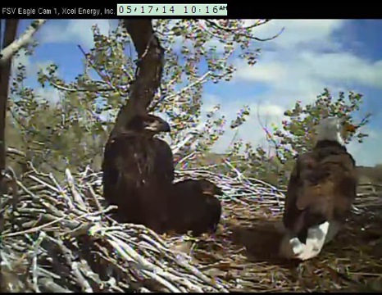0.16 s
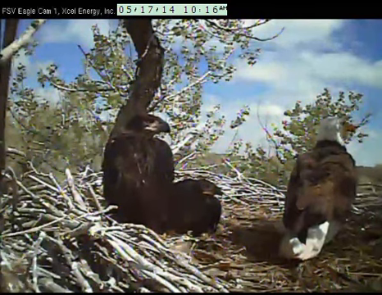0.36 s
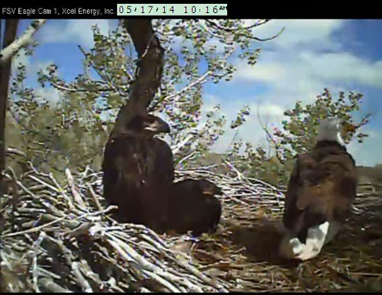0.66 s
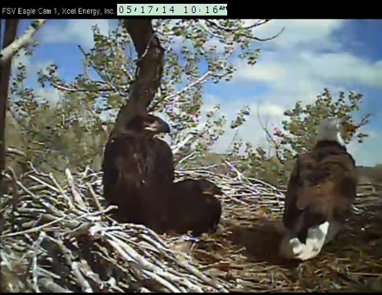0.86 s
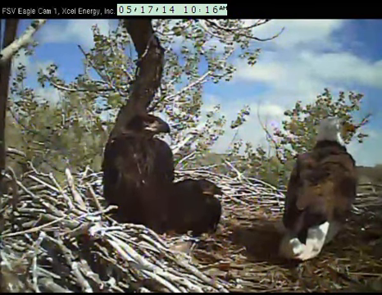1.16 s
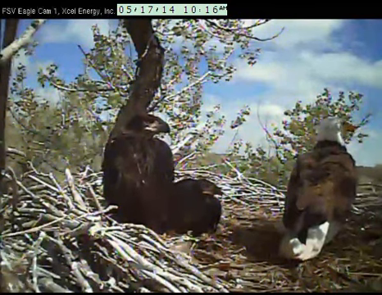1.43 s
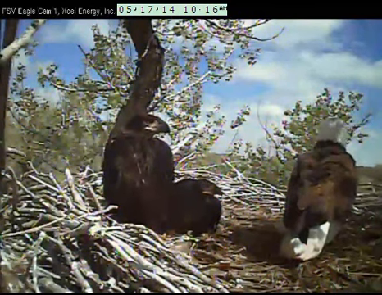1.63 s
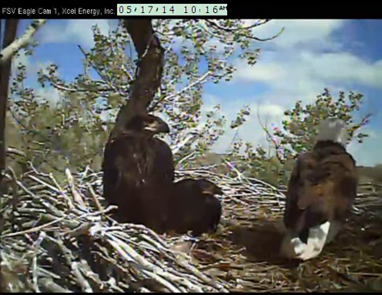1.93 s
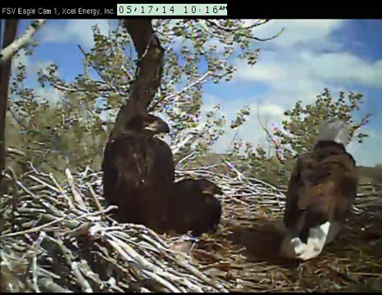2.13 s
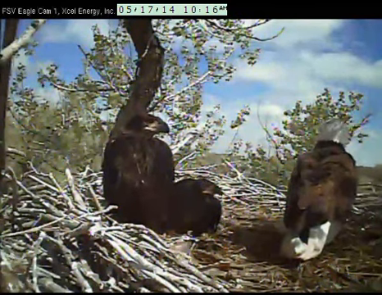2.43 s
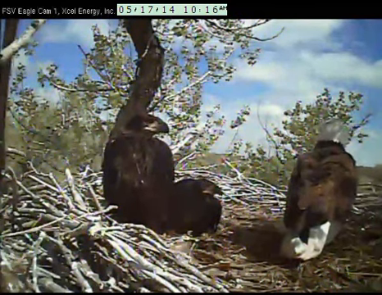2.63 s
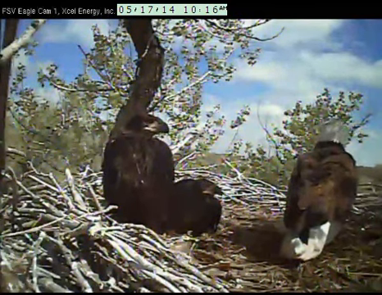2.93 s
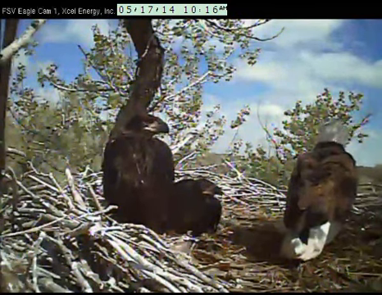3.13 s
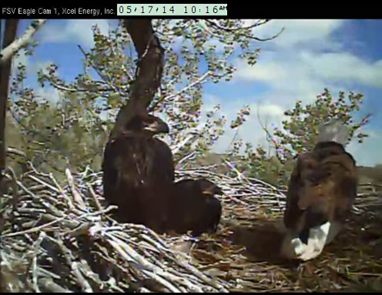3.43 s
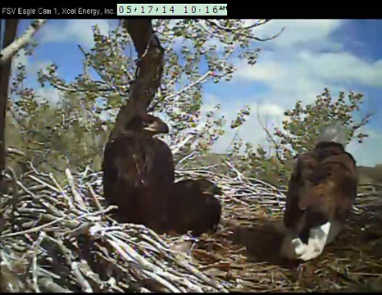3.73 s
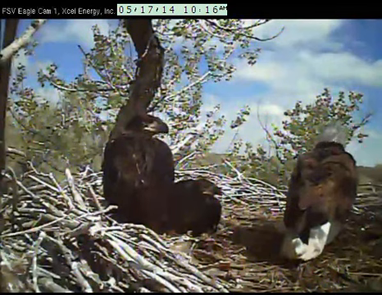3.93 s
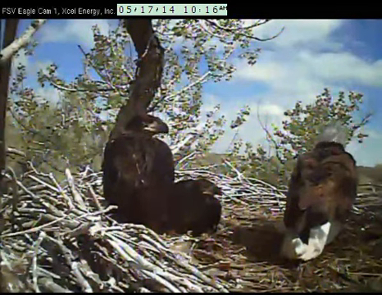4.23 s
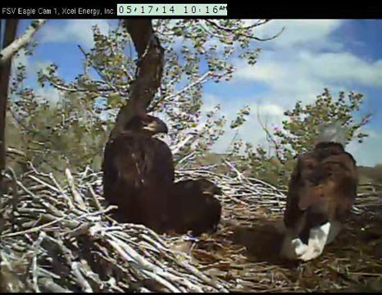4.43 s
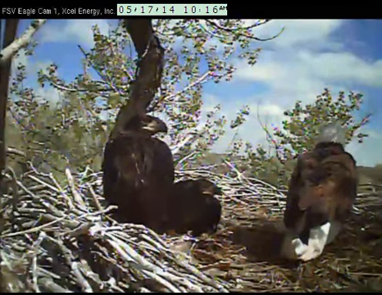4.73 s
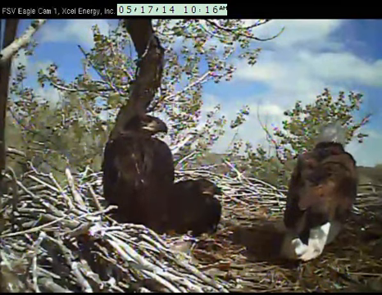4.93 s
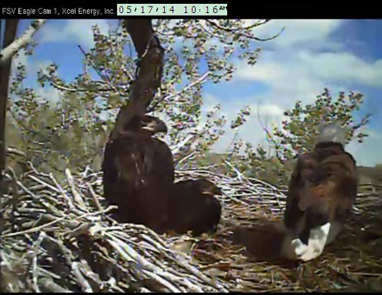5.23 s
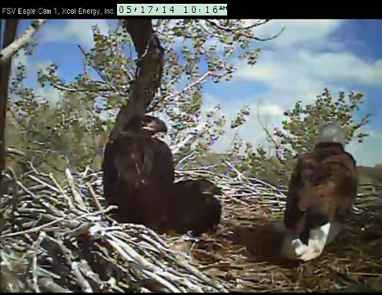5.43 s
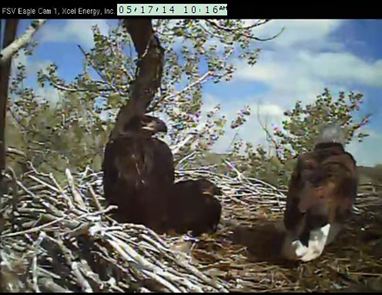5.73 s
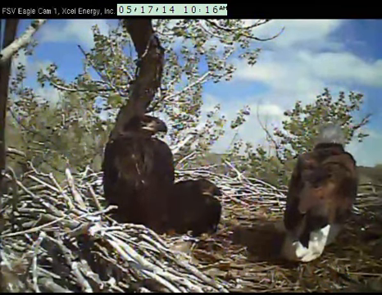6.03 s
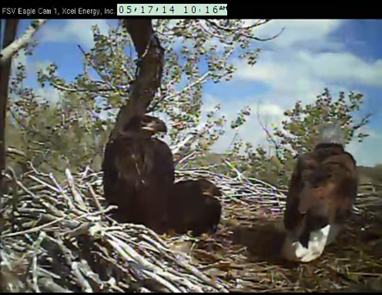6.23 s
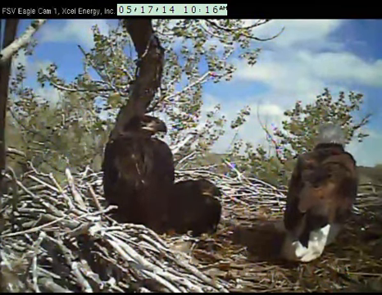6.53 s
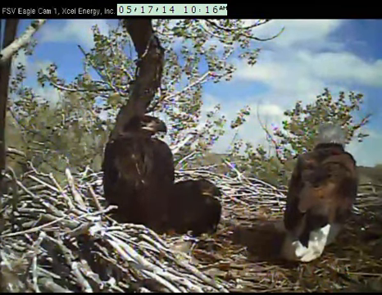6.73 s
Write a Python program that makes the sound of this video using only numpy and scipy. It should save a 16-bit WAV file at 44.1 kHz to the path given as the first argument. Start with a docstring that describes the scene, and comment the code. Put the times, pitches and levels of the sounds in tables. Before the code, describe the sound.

Steady low hum, a wavering fan whine, hiss and soft wind continue throughout, heard through a small, treble-limited microphone. A hollow gust swells around 0.8 s; faint high peeps occur near 0.6 and 1.3 s, with tiny twig ticks scattered about. At 1.65 s an eagle squeaks, then a wavering cry begins; a strong whistled scream joins it from 1.95 to 2.7 s, harsh with overload and beating side tones. After a quiet gap, a short cluck leads to a second, rising scream from 3.3 to 4.0 s, followed immediately by a higher buzzing yelp. From 4.6 to 5.0 s a third scream overlaps quick yelps; a higher yelp and a lower wail carry on to about 5.85 s. Thin songbird notes start at 5.65 s, becoming brighter, raspy upward chirps around 6.0-6.45 s, with a final eagle yelp near 6.4-6.6 s. Smaller chirps fade into wind and hum.

```python
"""At a nest in trees, eagles scream close to a fixed camera whose microphone stage overloads.
The eagles are nearly pure tones with weak harmonics, shaken or buzzed by modulation, plus a hiss of air.
Each loud whistle squares off, pushes the wind and hum down and breeds side tones with the second voice.
Small birds chirp further off as swept sines, and twigs tick as brief resonant noise.
Wind is shaped noise, hum and fan are sine lines, and the trees return a short echo of the birds."""
import sys
import numpy as np
from scipy import signal
from scipy.fft import rfft, irfft
from scipy.io import wavfile
from scipy.ndimage import uniform_filter1d

SR = 44100
rng = np.random.default_rng(int(sys.argv[2]) if len(sys.argv) > 2 else 0)


def int16_out(signal):
    """Quantize to a 16-bit WAV file."""
    q = np.round(np.clip(np.atleast_2d(signal).T, -1, 1) * 32767)
    wavfile.write(sys.argv[1], SR, q.astype(np.int16))


N = 302526
TIME = np.arange(N) / SR

# songbird syllable shapes named by the chirp table: length_share, pitch_ratio, level_db
RISE = [(0, .74, -21), (0.248, .91, -9), (0.479, 1, -1.5), (0.679, 1.06, -9), (.85, 1.22, -20),
        (1, 1.33, -23)]
FALL = [(0, 1.2, -2.5), (.25, 1.05, -5.5), (.6, .94, -2.5), (1, .82, -22)]
PEEP = [(0, 1.015, -12), (.2, 1, 0), (.7, 1, 0), (1, .99, -12)]


def undb(db):
    """Decibels to amplitude: 20 dB is a factor of ten."""
    return 10 ** (np.asarray(db) / 20)


def unit(x):
    """Normalise the signal power to rms 1."""
    return x / np.sqrt(np.mean(x ** 2))


def bump(x, centre, width):
    """A Gaussian rise and fall, 1 at the centre and 1/e one width away."""
    return np.exp(-((x - centre) / width) ** 2)


def colour(x, points):
    """Linear filtering: weight the spectrum by (Hz, dB) points joined on a log frequency axis."""
    hz, db = np.transpose(points)
    bins = np.maximum(np.fft.rfftfreq(N, 1 / SR), 1)
    gain = undb(np.interp(np.log(bins), np.log(hz), db))
    return irfft(rfft(x) * gain, N)


def resonant_noise(hz, width_hz, order=1):
    """Noise through a simple resonator, whose response falls off either side of hz; rms 1."""
    bins = np.maximum(np.fft.rfftfreq(N, 1 / SR), 1)
    quality = hz / width_hz
    response = 1 / (1 + 1j * (bins / hz - hz / bins) * quality)
    return unit(irfft(rfft(rng.standard_normal(N)) * response ** order, N))


def walk(rate):
    """Random modulation: lowpassed noise of about this many turns a second, rms 1."""
    bins = np.fft.rfftfreq(N, 1 / SR)
    return unit(irfft(rfft(rng.standard_normal(N)) / (1 + (bins / rate) ** 2), N))


def phase_of(hz):
    """Phase in radians is the running integral of frequency."""
    return 2 * np.pi * np.cumsum(hz) / SR


def tone(phase, db):
    """Simple harmonic motion: a sine with its rms at the given level."""
    return np.sqrt(2) * undb(db) * np.sin(phase)


def curves(rows):
    """Piecewise-linear motion: a soft gate over the span of the rows, then each column as a curve."""
    s, *columns = np.transpose(rows)
    inside = 1. * ((TIME > s[0]) & (TIME < s[-1]))
    gate = uniform_filter1d(inside, size=150)
    return [gate] + [np.interp(TIME, s, column) for column in columns]


def hum(drift=0.0072):
    """Periodic sources give line spectra: steady mains lines and the wavering whine of a small fan."""
    # mains lines: pitch_hz, level_db
    mains_lines = [(60, -71.5), (120, -74.5), (180, -85.5), (300, -75.5)]
    # camera fan lines: mean_pitch_hz, level_db
    fan_lines = [(448.5, -72), (897, -64)]
    speed = 1 + drift * walk(10.92)
    mains = sum(tone(2 * np.pi * (hz * TIME + rng.random()), db) for hz, db in mains_lines)
    fan = sum(tone(phase_of(hz * speed), db) for hz, db in fan_lines)
    return mains + fan


def wind(air_db=-60, hollow_hz=900, hollow_width_hz=300, flicker_db=1.5):
    """Broadband turbulence makes a steady rush, and gusts excite the resonance of the housing hollow."""
    # relative spectrum of the steady air: pitch_hz, density_db_per_hz
    air_spectrum = [(20, -15.5), (45, -13), (100, -2), (200, 2), (320, -0.5), (520, -3.5), (750, -3),
                    (1100, -21), (1500, -29.5), (2200, -17.5), (7000, -22.5), (12000, -17)]
    # gusts sounding in the camera housing: centre_s, half_length_s, rise_above_lull_db
    gusts = [(0.802, 0.3, 8.5), (2.489, 1, 3), (6.86, 0.34, 0.5)]
    lull_db = -60.5
    gust_db = lull_db + sum(db * bump(TIME, s, width) for s, width, db in gusts)
    rush = unit(colour(rng.standard_normal(N), air_spectrum)) * undb(air_db + .5 * walk(5.4))
    hollow = resonant_noise(hollow_hz, hollow_width_hz, order=3)
    return rush + hollow * undb(gust_db + flicker_db * walk(23))


def twigs():
    """Impulsive excitation: nest ticks and rustles, each a quick swell and decay of resonant noise."""
    # ticks and rustles, peaking a third of the length in: start_s, length_s, centre_hz, width_hz, level_db
    ticks = [(0.146, 0.052, 2900, 900, -63), (0.435, 0.011, 2910, 3500, -62.5),
             (1.105, 0.094, 3000, 800, -67), (1.612, 0.0016, 2770, 3500, -58),
             (2.787, 0.0068, 2820, 3500, -60.5), (3.22, 0.084, 2760, 680, -68),
             (4.56, 0.0026, 2800, 3500, -59), (4.588, 0.029, 2670, 1220, -64.5)]
    out = np.zeros(N)
    for start, length, hz, width_hz, db in ticks:
        age = np.maximum(TIME - start, 0) / length * 3
        swell = age * np.exp(1 - age)
        out += undb(db) * swell * resonant_noise(hz, width_hz, order=2)
    return out


def songbirds(flutter_db=5.0):
    """Frequency modulation: quick swept sines, the raspy ones shaken in pitch and level."""
    # syllables: start_s, length_s, pitch_hz, level_db, rasp_0_to_1, shape
    syllables = [ (0.624, 0.015, 4460, -66, 0, PEEP), (0.639, 0.014, 4350, -60.5, 0.16, PEEP),
                 (0.66, 0.12, 4075, -76, 0, PEEP), (1.293, 0.011, 4380, -70, 0, PEEP),
                 (1.335, 0.017, 4270, -70.5, 0.3, PEEP), (1.369, 0.081, 3990, -72, 0.13, PEEP),
                 (5.64, 0.072, 6900, -63.5, 0.7, FALL), (5.861, 0.074, 6900, -63, 0.52, FALL),
                 (5.987, .12, 5320, -47.5, 0.5, RISE), (6.164, 0.12, 5340, -50.5, 0.84, RISE),
                 (6.176, 0.051, 3080, -65.5, 0.83, FALL), (6.342, 0.1, 5200, -50.5, 0.53, RISE),
                 (6.493, 0.072, 5000, -55, 0.2, FALL), (6.60, 0.032, 3526, -56, 0.42, PEEP),
                 (6.691, 0.026, 3200, -67, 1, FALL), (6.798, 0.051, 3100, -72, 0.5, FALL), ]
    out, flutter = np.zeros(N), walk(90)
    shake = .042 * walk(500)
    for start, length, hz, db, rasp, shape in syllables:
        share, ratio, shape_db = np.transpose(shape)
        on = (TIME > start) & (TIME < start + length)
        progress = (TIME[on] - start) / length
        pitch = hz * np.interp(progress, share, ratio) * (1 + rasp * shake[on])
        level_db = db + np.interp(progress, share, shape_db) + rasp * flutter_db * flutter[on]
        out[on] += tone(phase_of(pitch), level_db)
    return out


def trees(x, wet_db, t60):
    """Scattering: branches and leaves return a diffuse echo that decays by 60 dB in t60 seconds."""
    age = TIME[:SR]
    decay = np.exp(-np.log(1000) * age / t60)
    build_up = 1 - np.exp(-age / 0.0099)
    tail = rng.standard_normal(SR) * decay * build_up
    return x + undb(wet_db) * signal.fftconvolve(x, tail / np.linalg.norm(tail))[:N]


def held(start, length):
    """Amplitude envelope of a held call: it opens fast, holds and closes fast."""
    attack_s, release_s = 0.022, 0.021
    opening = np.clip((TIME - start) / attack_s, 0, 1)
    closing = np.clip((start + length - TIME) / release_s, 0, 1)
    return (opening * closing) ** 2


def blip(start, length, hz, rise):
    """Linear chirp: one swell of amplitude on a straight glide of pitch."""
    age = np.clip(TIME - start, 0, length)
    return np.sin(np.pi * age / length) ** 2, hz + rise * age


def clucks():
    """Short low-register chirps before and after calls, as low_notes yields them."""
    # clucks: start_s, length_s, pitch_hz, glide_hz_per_s, level_db, second_harmonic_db
    notes = [(3.251, 0.032, 534, 1196, -55, -54), (4.576, 0.023, 569, 509, -48, -50.5),
             (5.841, 0.022, 572, -3500, -51.5, -41.5)]
    for start, length, hz, rise, db, second_db in notes:
        yield *blip(start, length, hz, rise), np.full(N, db), np.full(N, second_db)


def wail():
    """A low-register call whose fundamental breaks upward halfway, as low_notes yields it."""
    # breakpoints: time_s, pitch_hz, level_db, second_harmonic_db
    points = [(5.124, 1362, -50.5, -44), (5.26, 1392, -56.5, -38), (5.451, 1448, -59.5, -42.5),
              (5.474, 1579, -67, -46), (5.651, 1668, -55, -57), (5.73, 1698, -52, -46),
              (5.785, 1731, -51.5, -61), (5.828, 1714, -51, -51), (5.855, 1604, -56, -41)]
    start, end = points[0][0], points[-1][0]
    yield held(start, end - start), *curves(points)[1:]


def quaver():
    """Vibrato-like random modulation: a long cry under the first scream, as whistles yields it."""
    # breakpoints: time_s, pitch_hz, level_db
    points = [(1.714, 2544, -54.5), (1.79, 2658, -56), (1.865, 2798, -50.5), (1.98, 2825, -43.5),
              (2.10, 2692, -50), (2.33, 2696, -46.5), (2.44, 2590, -54.5), (2.68, 2600, -57),
              (2.84, 2300, -72.5)]
    wobble_share, wobble_per_s = 0.011, 16.1
    octave_db, rough = -13, 0.79
    gate, hz, db = curves(points)
    yield gate, hz * (1 + wobble_share * walk(wobble_per_s)), db, octave_db, rough, 0


def squeaks():
    """Linear chirps in the upper register, as whistles yields them."""
    # squeaks: start_s, length_s, pitch_hz, glide_hz_per_s, level_db, roughness_0_to_1
    notes = [(1.655, 0.084, 2230, 2304, -50.5, 0.6), (4.224, 0.022, 2217, -16000, -54.5, 0.2),
             (4.744, 0.056, 3000, 1199, -46, 0.7)]
    octave_db = -31
    for start, length, hz, rise, db, rough in notes:
        yield *blip(start, length, hz, rise), db, octave_db, rough, 0


def yelp(start, length, hz, rise, bend, drop):
    """Pitch glide with exponential transients at its opening and closing, under a held envelope."""
    bend_s, drop_s = 0.04, 0.017
    age = np.clip(TIME - start, 0, length)
    transients = 1 + bend * np.exp(-age / bend_s) - drop * np.exp((age - length) / drop_s)
    return held(start, length), (hz + rise * age) * transients


def yelps():
    """Frequency-modulated calls of the second eagle, as whistles yields them."""
    # yelps: start_s, length_s, pitch_hz, rise_hz_per_s, opening_bend_share, closing_drop_share,
    # level_db, fade_db_per_s, roughness_0_to_1, buzz_depth_0_to_1
    calls = [ (3.996, 0.228, 3725, 60, -0.046, 0.16, -45, 14, 0.48, 0.25),
             (4.728, 0.15, 2795, 836, -0.0047, -0.045, -51.5, -4, 0.4, 0.27),
             (4.877, 0.16, 2920, 726, 0, -0.053, -49.5, 11, 0.5, 0.3),
             (5.017, 0.3, 3696, 327, -0.1, 0.22, -50.5, 17.5, 0.72, 0.23),
             (6.203, 0.21, 3480, 467, -0.028, 0, -73, -2, 0.91, 0.19),
             (6.378, 0.255, 3618, 149, -0.022, 0.043, -54, 7, 0.74, 0.16), ]
    octave_db = -24
    for start, length, hz, rise, bend, drop, db, fade_db, rough, buzz in calls:
        level_db = db - fade_db * np.clip(TIME - start, 0, length)
        yield *yelp(start, length, hz, rise, bend, drop), level_db, octave_db, rough, buzz


def screams():
    """Level and harmonic content vary together: screams sag and surge, as whistles yields them."""
    # pitch of each scream: time_s, pitch_hz
    pitches = [
        [(1.953, 2114), (1.973, 2103), (2.009, 2048), (2.117, 2043), (2.437, 2098), (2.571, 2171),
         (2.693, 2138), (2.717, 1910)],
        [(3.29, 1968), (3.302, 1959), (3.332, 2052), (3.4, 2061), (3.576, 2136), (3.976, 2241), (4.0, 2278),
         (4.014, 2320)],
        [(4.615, 2035), (4.621, 2078), (4.825, 2197), (4.843, 2233), (4.947, 2257), (5.025, 2328), (5.03, 2365)],
    ]
    # the same screams before sag and surge: level_db, sag_db, second_harmonic_db,
    # second_harmonic_surge_gain_db, roughness_0_to_1, buzz_depth_0_to_1
    levels = [(-37.5, 2.5, -12, 1, 0.23, 0), (-35.5, 5, -17.5, 12, 0.01, 0), (-40, 7.5, -22.5, -7, 0, 0.08)]
    sag_at_s, sag_width_s, sag_dull_db = 0.17, 0.058, 10.5
    surge_at_share, surge_width_share, surge_db = 0.757, 0.1, 6.5
    for pitch, (db, sag_db, octave_db, bright_db, rough, buzz) in zip(pitches, levels):
        s, hz = np.transpose(pitch)
        start, length = s[0], s[-1] - s[0]
        sag = bump(TIME - start, sag_at_s, sag_width_s)
        surge = bump((TIME - start) / length, surge_at_share, surge_width_share)
        level_db = db - sag_db * sag + surge_db * surge
        second_db = octave_db - sag_dull_db * sag + bright_db * surge
        yield held(start, length), np.interp(TIME, s, hz), level_db, second_db, rough, buzz


def low_notes():
    """Lower register, rich in harmonics: (envelope, pitch, level, second harmonic level) per call."""
    yield from wail()
    yield from clucks()


def whistles():
    """Upper register, nearly sinusoidal: (envelope, pitch, level, second harmonic, roughness, buzz)."""
    yield from screams()
    yield from yelps()
    yield from squeaks()
    yield from quaver()


def eagles(waver=0.0015, jitter=0.0014, rough_waver=0.0048, rough_flutter_db=4.5, buzz_hz=348,
           third_db=-32, octave_wander_db=4.5):
    """Syrinx oscillation: nearly pure tones, the rough ones shaken, some buzzing, all with hissing air."""
    # steady levels of the third and fourth low-register harmonics: level_db
    overtones_db = [-62, -69]
    # moments when a call turns breathy: centre_s, half_length_s, added_air_db_re_tone
    breaths = [(2.01, 0.077, -16.5), (2.555, 0.13, -15.5), (2.708, 0.028, -7.5), (3.426, 0.091, -12),
               (3.623, 0.088, -22.5), (4.072, 0.13, -18), (4.77, 0.093, -16.5), (4.958, 0.24, -21.5),
               (5.144, 0.02, -14), (5.53, 0.091, -13.5)]
    clear_air_db = -41.5  # air in a clear call, re the tone
    voice, strength = np.zeros(N), np.zeros(N)
    tremble = 1 + waver * walk(52) + jitter * walk(500)
    shake, flutter = walk(90), walk(35)
    beat = phase_of(buzz_hz * (1 + .04 * walk(60)))
    buzz = np.sin(beat) - .5 * np.cos(2 * beat)  # peaky pulses give several side lines
    wander_db = octave_wander_db * walk(18)
    for gate, hz, db, octave_db, rough, buzz_depth in whistles():
        on = gate > 1e-6
        phase = phase_of((hz * (tremble + rough * rough_waver * shake))[on])
        loudness = gate * undb(db)
        roughening = undb(rough * rough_flutter_db * flutter[on])
        size = loudness[on] * roughening * (1 + buzz_depth * buzz[on])
        # the membrane swings further one way than the other, which adds the octave
        second_db = np.minimum(octave_db + wander_db, -3)[on]
        octave = tone(2 * phase - np.pi / 2, second_db)
        voice[on] += size * (tone(phase, 0) + octave + tone(3 * phase, third_db))
        strength += loudness
    for gate, hz, db, second_db in low_notes():
        on = gate > 1e-6
        phase = phase_of((hz * tremble)[on])
        # the second harmonic falls in the throat resonance and often outweighs the first
        levels = [db[on], second_db[on], *overtones_db]
        # the resonance also delays the harmonics unevenly
        wave = sum(tone(k * phase + k * k * np.pi / 4, level) for k, level in enumerate(levels, 1))
        voice[on] += (gate * undb(0.96 * flutter))[on] * wave
        strength += gate * undb(second_db)
    air = undb(clear_air_db) + sum(undb(db) * bump(TIME, s, width) for s, width, db in breaths)
    return voice + strength * air * resonant_noise(3800, 4500)


def scene():
    """Superposition: the sources add, and only the birds carry an echo from the trees."""
    near = trees(eagles(), wet_db=-14.5, t60=0.38)
    far = trees(songbirds(), wet_db=-1.5, t60=0.3)
    return (near + far + twigs() + wind() + hum())[None]


def record(dry, ceiling_db=-43, knee=48.0, bias=0.061, leak_db=-16, hiss_db=-73):
    """Nonlinear distortion: the microphone stage saturates off centre and its rectified excess leaks."""
    # treble and bass response of the camera: pitch_hz, gain_db
    response = [(20, 6.5), (60, -3), (3000, 0), (6000, -1), (7000, 0), (7600, -4), (8200, -12.5),
                (9000, -50.5), (10400, -42)]
    # relative spectrum of the electronic hiss: pitch_hz, density_db_per_hz
    hiss_spectrum = [(20, -18), (500, -1.5), (4000, -5.5), (7000, -5), (8000, -11), (9000, -18),
                     (10400, -29)]
    top_hz = 10400
    # four times the sample rate leaves room for the distortion products
    drive = signal.resample_poly(dry[0], 4, 1) / undb(ceiling_db) - bias
    squared = drive / (1 + np.abs(drive) ** knee) ** (1 / knee)
    # two loud tones beat, so the rectified excess sounds at their difference
    beat_band = signal.butter(2, [350, 850], "band", fs=4 * SR, output="sos")
    beat = signal.sosfilt(beat_band, np.abs(drive - squared))
    sound = signal.resample_poly(squared + bias + undb(leak_db) * beat, 1, 4) * undb(ceiling_db)
    # the camera blocks the offset, cuts the treble and adds its own hiss
    sound = signal.sosfilt(signal.butter(2, 30, "high", fs=SR, output="sos"), sound)
    hiss = undb(hiss_db) * unit(colour(rng.standard_normal(N), hiss_spectrum))
    lowpass = signal.ellip(8, .2, 70, top_hz, fs=SR, output="sos")
    return signal.sosfilt(lowpass, colour(sound, response) + hiss)[None]


dry = scene()
out = record(dry)
int16_out(out)
```